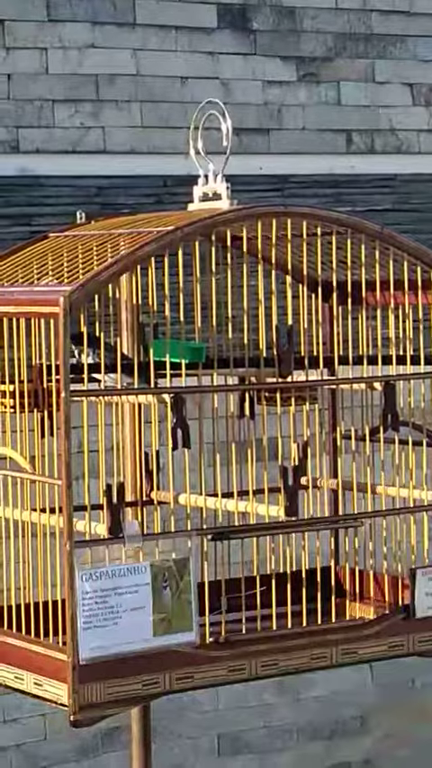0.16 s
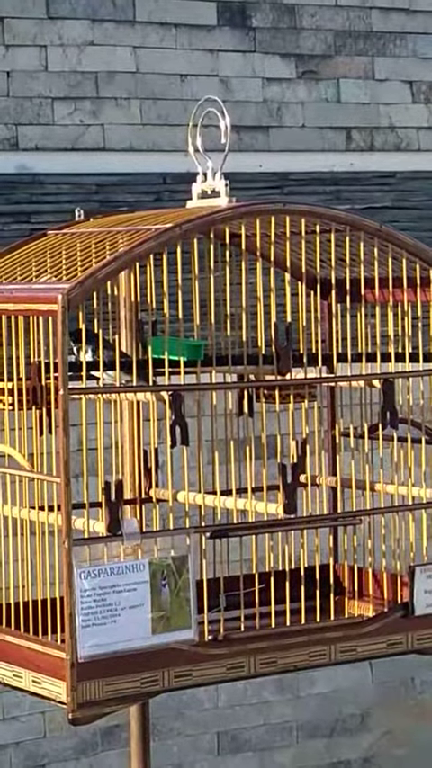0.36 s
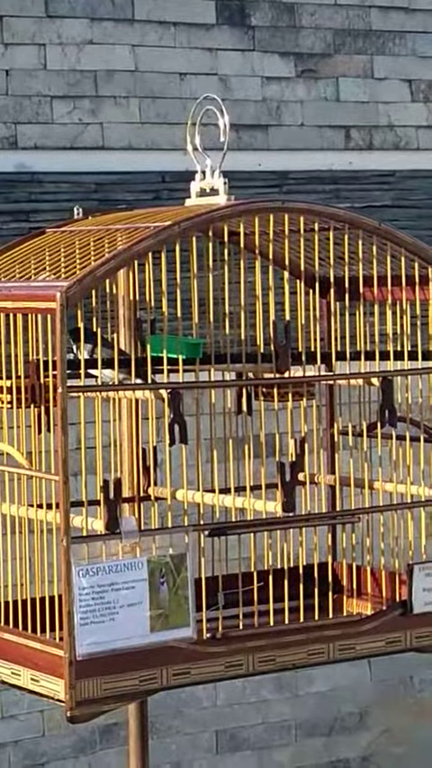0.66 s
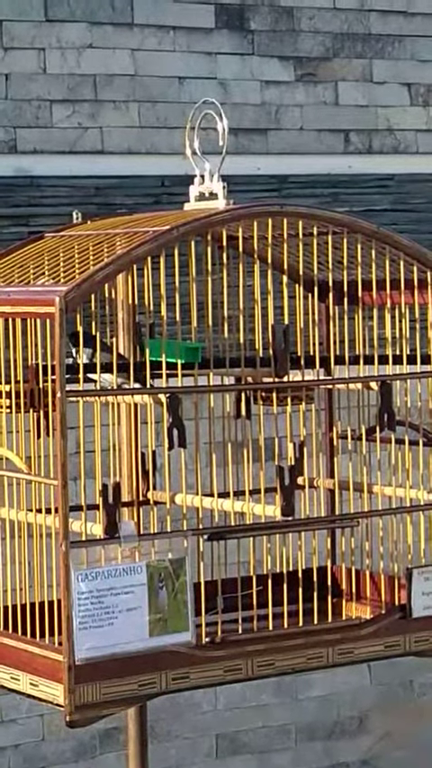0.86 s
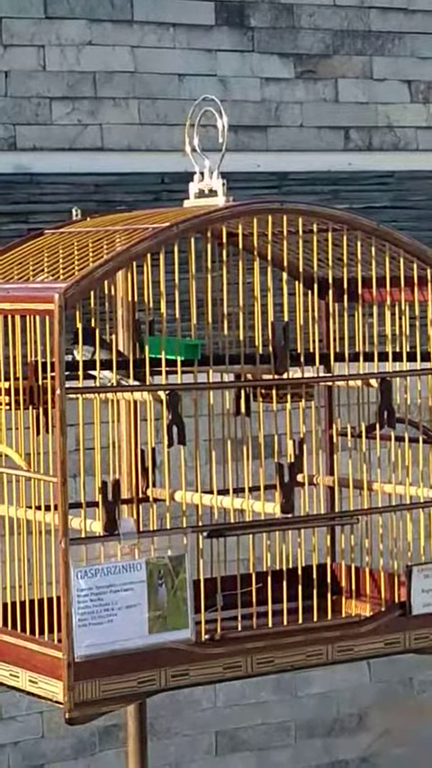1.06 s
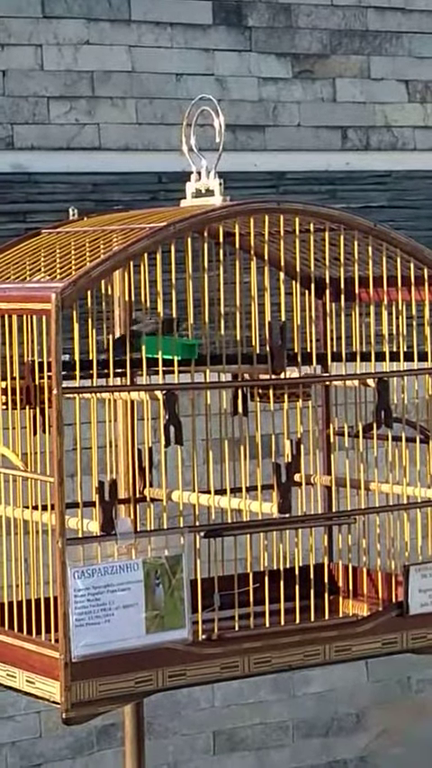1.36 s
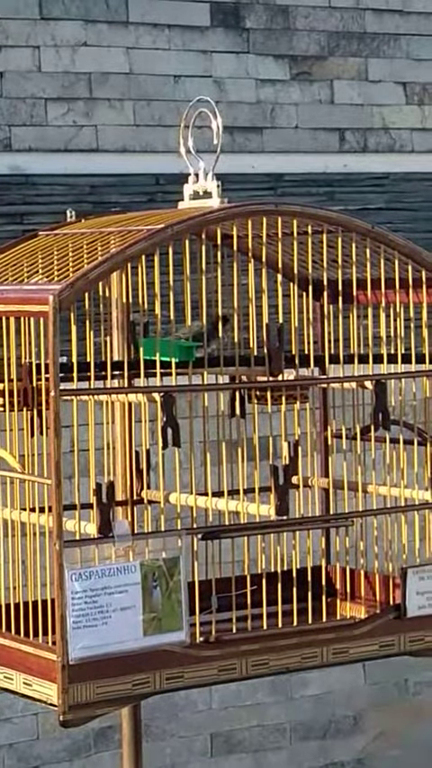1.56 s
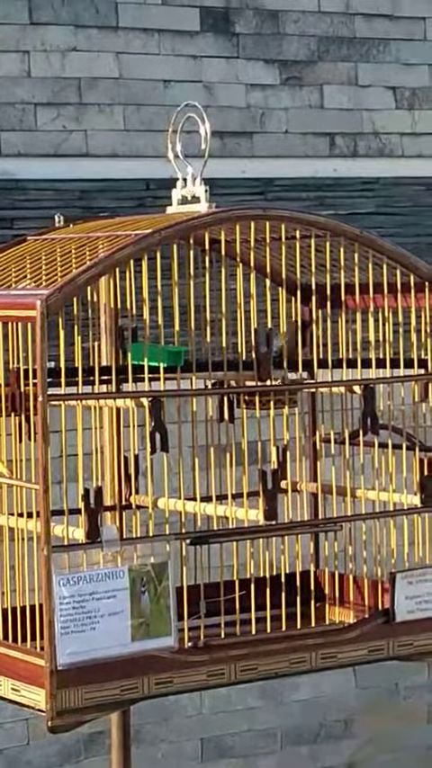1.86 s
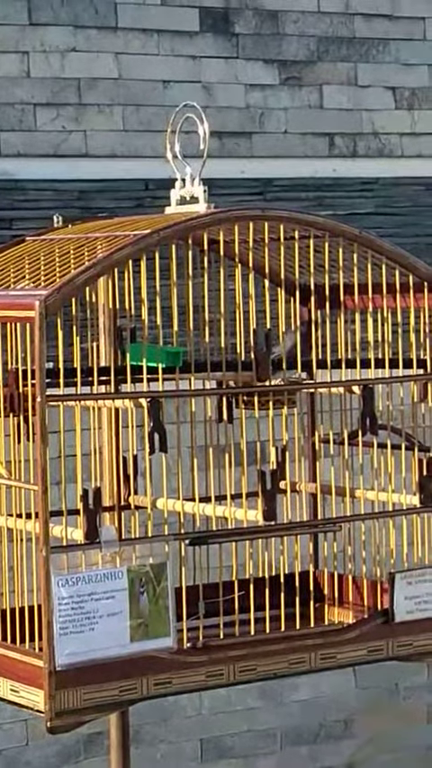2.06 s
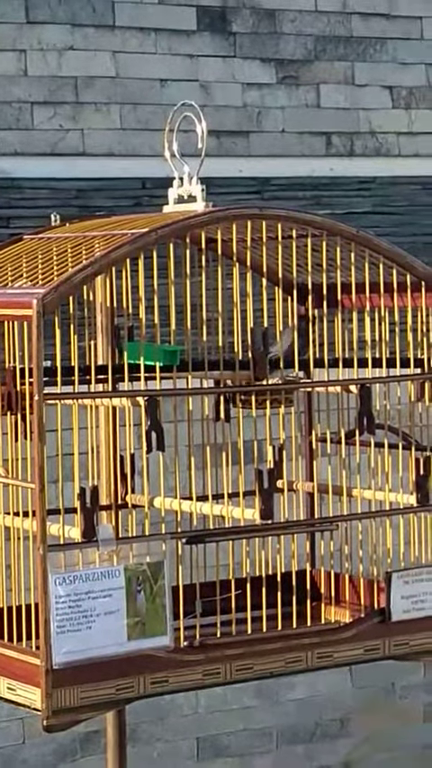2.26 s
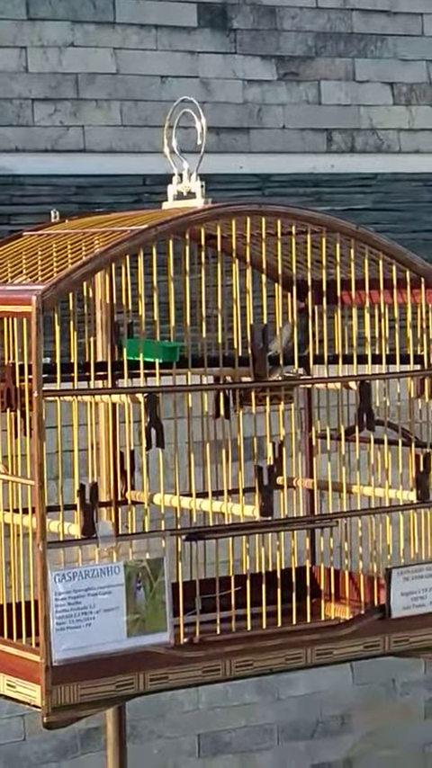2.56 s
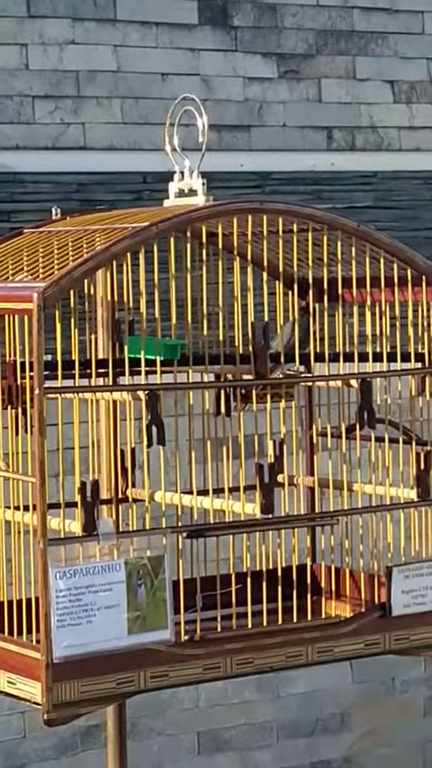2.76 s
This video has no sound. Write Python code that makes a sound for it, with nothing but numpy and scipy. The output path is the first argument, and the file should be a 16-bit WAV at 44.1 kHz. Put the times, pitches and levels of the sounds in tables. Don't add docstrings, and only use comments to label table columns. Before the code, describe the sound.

Birdsong in a walled yard: high whistles, a loud rapid closing trill, irregular wooden knocking, low hum

```python
import sys
import numpy as np
from scipy import signal
from scipy.fft import rfft, irfft
from scipy.io import wavfile
from scipy.ndimage import uniform_filter1d

SR = 44100
rng = np.random.default_rng(int(sys.argv[2]) if len(sys.argv) > 2 else 0)


def output_pcm(signal):
    pcm = np.clip(np.atleast_2d(signal).T, -1, 1) * 32767
    wavfile.write(sys.argv[1], SR, np.round(pcm).astype(np.int16))


def ratio_of_db(decibels):
    return 10 ** (np.asarray(decibels, float) / 20)


N = 127890
LEAD = SR // 5

# second harmonic in dB, third harmonic in dB.
OVERTONES = [(-21, -14.5), (-22, -22.5), (-24, -28), (-31.5, -26.5), (-55, -44)]


def evened(x):
    return x / np.sqrt(np.mean(x ** 2) + 1e-20)


def read(points, hz):
    f, value = np.transpose(points)
    return np.interp(np.log(hz + 1), np.log(f + 1), value)


def add(mix, s, sound):
    part = mix[round(s * SR) + LEAD:][:len(sound)]
    part += sound[:len(part)]


def drift(count, size):
    return evened(uniform_filter1d(uniform_filter1d(rng.standard_normal(count), size), size))


def whistle(hz, level_db, second_db, third_db):
    waver, haze_db, flutter_db, fade_samples = .002, -24, 1.2, 200
    count = len(hz)
    turn = 2 * np.pi * np.cumsum(hz * (1 + waver * drift(count, size=60))) / SR
    third = np.sin(3 * turn) * (hz < SR / 8)
    fourth = .5 * np.sin(4 * turn) * (hz < SR / 12)
    upper = ratio_of_db(second_db) * np.sin(2 * turn) + ratio_of_db(third_db) * (third + fourth)
    tone = np.sin(turn) * (1 + ratio_of_db(haze_db) * drift(count, size=10))
    tone = tone + upper * (1 + .5 * drift(count, size=45))
    i = np.arange(count)
    edge = np.minimum(np.minimum(i, i[::-1]) / fade_samples, 1)
    return np.sqrt(2) * tone * edge * ratio_of_db(level_db + flutter_db * drift(count, size=120))


def phrase(notes, overtones):
    out = np.zeros(N + LEAD)
    for note in notes:
        s, hz, db = np.transpose(note)
        s = np.sort(s)
        t = np.arange(s[0], s[-1], 1 / SR)
        glide_hz = uniform_filter1d(np.interp(t, s, hz), size=400)
        add(out, s[0], whistle(glide_hz, np.interp(t, s, db), *overtones))
    return out


def songbirds():
    # time in seconds, pitch in Hz, level in dB.
    warble = [
        [(-.09, 5257, -40.5), (-.06, 5120, -41), (-.03, 3785, -35), (-.005, 4140, -88)],
        [(.083, 3553, -50), (.1, 3000, -50.5), (.122, 2420, -59), (.152, 3332, -49), (.178, 3608, -41.5),
         (.2, 4293, -37), (.225, 4417, -48.5), (.25, 4260, -37)],
        [(.31, 5530, -48), (.332, 5160, -37.5), (.357, 5862, -45.5), (.382, 5590, -37.5), (.407, 4730, -38.5)],
        [(.485, 4380, -45), (.51, 3018, -52), (.54, 4075, -41), (.565, 3800, -50), (.6, 3092, -45.5)],
        [(.675, 5278, -40.5), (.695, 5367, -43.5), (.715, 4054, -37.5), (.76, 4356, -51.5), (.785, 4410, -42)],
        [(.89, 3714, -63), (.92, 2595, -49), (.94, 3770, -52), (.965, 3100, -54.5), (1.01, 3105, -73)],
    ]
    neighbour = [
        [(1.01, 3643, -60), (1.05, 3498, -47), (1.085, 3270, -48.5), (1.12, 3270, -71)],
        [(1.215, 3926, -53.5), (1.25, 3794, -48.5), (1.275, 3304, -40.5), (1.3, 2876, -52.5)],
        [(1.31, 3668, -42), (1.34, 3680, -52), (1.35, 3640, -78), (1.365, 3577, -49.5), (1.39, 3513, -37),
         (1.43, 3276, -48)],
        [(2.03, 8470, -72), (2.052, 7220, -25.5), (2.08, 6747, -35), (2.125, 6570, -37)],
        [(2.14, 4900, -48), (2.17, 5910, -50.5), (2.2, 6100, -65)],
        [(2.26, 5320, -46.5), (2.285, 6500, -36.5), (2.31, 7600, -37)],
        [(2.3, 5390, -49.5), (2.325, 4840, -30), (2.35, 4350, -63)],
        [(2.375, 3400, -57), (2.4, 3850, -50), (2.43, 4000, -61)],
    ]
    falls = [
        [(1.487, 5570, -57), (1.5, 6134, -44), (1.54, 6260, -40), (1.58, 5850, -31.5), (1.615, 4616, -26)],
        [(1.645, 4226, -46), (1.665, 4200, -37.5), (1.69, 4190, -40), (1.715, 4126, -39), (1.75, 3917, -36.5),
         (1.83, 3935, -60)],
        [(1.86, 7870, -39.5), (1.872, 6700, -36), (1.89, 5600, -32.5), (1.92, 4430, -32.5),
         (1.955, 3620, -43.5)],
    ]
    rises = [
        [(1.86, 2543, -56), (1.92, 2910, -41.5), (1.96, 3374, -33.5), (2.0, 3470, -30), (2.03, 3570, -64)],
        [(2.13, 2500, -55), (2.165, 2760, -40), (2.195, 3061, -34.5), (2.22, 3160, -37), (2.245, 3710, -29.5),
         (2.268, 4076, -22), (2.3, 4320, -27.5), (2.325, 3970, -55)],
        [(2.365, 2777, -61), (2.39, 2720, -33.5), (2.42, 3110, -36.5), (2.44, 3250, -30.5), (2.46, 3600, -30),
         (2.478, 3954, -26), (2.51, 4065, -23.5), (2.525, 3947, -40), (2.54, 3880, -63)],
    ]
    # left over right in dB, close reflections in dB, wall echo in dB, yard in dB.
    perches = [(1.2, -4, -7, -0.5), (-1.5, -8.5, -63, -6), (3.5, -6.5, -8.5, -4), (3.5, -5, -8, -9.5)]
    songs = zip((warble, neighbour, falls, rises), OVERTONES, perches)
    return sum(place(phrase(notes, overtones), *perch) for notes, overtones, perch in songs)


def trill():
    # middle of the sweep in seconds, level in dB.
    sweeps = [(2.588, -28.5), (2.598, -28.5), (2.610, -21), (2.618, -36), (2.631, -19.5), (2.64, -29),
              (2.652, -19.5), (2.666, -24), (2.673, -21.5), (2.69, -29.5), (2.7, -22), (2.711, -19.5),
              (2.724, -29), (2.739, -21), (2.748, -27.5), (2.761, -29), (2.77, -25.5), (2.783, -27),
              (2.797, -33)]
    sweep_s, sharpness, hiss_db = .015, 0.4, -16
    throat_hz, throat_db = 5350, -30
    u, out = np.linspace(0, 1, round(sweep_s * SR)), np.zeros(N + LEAD)
    shapes = np.linspace((6404, 3800, 1), (7767, 3100, .75), len(sweeps))
    for (s, db), (start_hz, end_hz, bend) in zip(sweeps, shapes):
        hz = start_hz * (end_hz / start_hz) ** u ** bend * rng.uniform(.96, 1.04)
        tone = whistle(hz, db + throat_db * np.log2(hz / throat_hz) ** 2, *OVERTONES[-1])
        hiss = signal.lfilter(*signal.butter(2, .12, 'high'), rng.standard_normal(len(u)))
        swell = abs(np.sin(np.pi * u)) ** sharpness
        add(out, s - sweep_s / 2, (tone + hiss * ratio_of_db(db + hiss_db)) * swell)
    return out


def flap():
    start_s, level_db, t60_s = 1.832, -35.5, 0.058
    t, out = np.arange(8000) / SR, np.zeros(N + LEAD)
    rustle = signal.lfilter(*signal.butter(2, .2, 'high'), rng.standard_normal(len(t)))
    add(out, start_s, rustle * ratio_of_db(level_db - 60 * t / t60_s))
    return out


def knocks():
    # time in seconds, peak level in dB, main ring in Hz.
    onsets = [(0.088, -21, 975), (0.094, -21.5, 874), (0.122, -29, 945), (0.149, -30.5, 838),
              (0.333, -31, 884), (0.498, -41, 860), (0.536, -32, 870), (0.615, -29, 964),
              (0.663, -36.5, 794), (0.919, -25, 926), (0.933, -23.5, 862), (0.97, -25.5, 918),
              (1.185, -30, 851), (1.24, -38, 864), (1.353, -35, 861), (1.436, -27.5, 944),
              (1.471, -28, 814), (1.526, -35, 855), (1.713, -17.5, 980), (1.735, -23, 851),
              (1.77, -27, 846), (1.793, -48.5, 840), (1.962, -32.5, 830), (2.114, -42, 850),
              (2.223, -40, 977), (2.248, -31, 793), (2.501, -29.5, 950), (2.52, -23.5, 838),
              (2.561, -35.5, 906), (2.579, -34, 945), (2.652, -36.5, 960), (2.757, -30.5, 860)]
    # frequency in Hz, level in dB, t60 in seconds.
    wood = [(900, 11.5, 0.021), (1092, 5.5, 0.014), (422, -6, 0.051), (557, 1.5, 0.022), (244, -12, 0.064),
            (1537, -2, 0.013), (2500, -9, 0.02)]
    trim_db, tick_db, tick_t60_s, mode_spread = -2, -30, 0.014, .24
    t, out = np.arange(5000) / SR, np.zeros(N + LEAD)
    hz, mode_db, t60_s = np.transpose(wood)[:, :, None]
    chances = .5 + rng.random((len(onsets), 2, len(wood)))
    for (s, db, ring_hz), (struck, off) in zip(onsets, chances):
        spread_hz = hz * (1 + mode_spread * (off[:, None] - 1))
        tuned_hz = np.vstack([[ring_hz], spread_hz[1:]])
        modes = ratio_of_db(mode_db - 60 * t / t60_s) * np.sin(2 * np.pi * tuned_hz * t)
        tick = uniform_filter1d(rng.standard_normal(len(t)), size=3) * ratio_of_db(tick_db - 60 * t / tick_t60_s)
        onset = np.minimum(t / .004, 1)
        add(out, s - .002, ratio_of_db(db + trim_db) * onset * (struck @ modes + tick))
    return out


def yard(x):
    # frequency in Hz, t60 in seconds.
    decay = [(300, 1), (1000, 0.46), (3000, 1), (5500, 0.67), (12000, 0.71)]
    taps = np.zeros((2, SR))
    at = np.arange(400, SR - 20, 20) + rng.integers(0, 20, (2, (SR - 401) // 20))
    np.put_along_axis(taps, at, rng.choice([-1., 1.], at.shape), 1)
    hz, t, z = signal.stft(taps, SR, nperseg=256)
    tail = signal.istft(z * ratio_of_db(-60 * t / read(decay, hz)[:, None]), SR, nperseg=256)[1]
    return signal.fftconvolve(x[None], tail / np.linalg.norm(tail[0]), axes=1)[:, :len(x)]


def place(x, pan_db, early_db, echo_db, yard_db):
    echo_s, far_echo_s, far_echo_db = (.0245, .0246), 0.14, -51
    taps = np.zeros((2, SR // 7))
    at, sign = rng.integers(60, 900, 8), rng.uniform(-1, 1, (3, 8))
    for side in range(2):
        taps[side, at] = ratio_of_db(early_db) * (sign[2] + 0.57 * sign[side])
        taps[side, round(echo_s[side] * SR)] = ratio_of_db(echo_db)
        taps[side, round(far_echo_s * SR)] = ratio_of_db(far_echo_db)
        taps[side, 0] = 1
    near = signal.fftconvolve(x[None], taps, axes=1)[:, :len(x)]
    tail = yard(x)
    tail = np.array([tail[0], .93 * tail[0] + .36 * tail[1]])
    return near * ratio_of_db(np.array([[pan_db / 2], [-pan_db / 2]])) + ratio_of_db(yard_db) * tail


def hum():
    # frequency in Hz, level in dB per Hz.
    city = [(42, -50), (65, -0.5), (140, 9.5), (500, -3.5), (900, -4), (1900, -18), (3300, -32),
            (5200, -20.5), (7500, -26), (14000, -26.5)]
    # frequency in Hz, left-right likeness from 0 to 1.
    likeness = [(30, .1), (130, 0.65), (300, 0.32), (700, 0.74), (1500, 1), (3000, 0.73)]
    level_db, patch_db, pan_db = -48.5, 2, 2.2
    frames, hz = N // 256 + 5, np.fft.rfftfreq(1024, 1 / SR)
    a, b, c, d, patches = rng.standard_normal((frames, 513, 5)).T
    patches = evened(uniform_filter1d(uniform_filter1d(patches, size=8, axis=0), size=12, axis=1))
    same = np.clip(read(likeness, hz), -1, 1)[:, None]
    left, other = a + 1j * b, c + 1j * d
    z = np.array([left, same * left + np.sqrt(1 - same ** 2) * other])
    balance_db = np.array([pan_db / 2, -pan_db / 2])[:, None, None]
    z = z * ratio_of_db(read(city, hz)[:, None] + patch_db * patches + balance_db)
    return ratio_of_db(level_db) * evened(signal.istft(z, nperseg=1024, noverlap=768)[1][:, :N])


def scene():
    birds = songbirds() + place(trill() + flap(), pan_db=.5, early_db=-11, echo_db=-11, yard_db=-8)
    wood = knocks()
    tail = yard(wood)
    boards = wood + ratio_of_db(-4.5) * (tail.mean(0) + .5 * tail)
    return (birds + boards)[:, LEAD:] + hum()


def masked(x):
    mask_db, hole_db = -9.5, -35
    hz, _, z = signal.stft(np.array([x[0] + x[1], x[0] - x[1]]) / 2, SR, nperseg=1024)
    power = uniform_filter1d(abs(z) ** 2, size=3, axis=2)
    band = np.repeat(power[:, :512].reshape(2, 64, 8, -1).mean(2), 8, axis=1)
    around = uniform_filter1d(band ** .5, size=64, axis=1)
    weak = band < (ratio_of_db(mask_db) * around) ** 2
    open_hz = (hz > 1900) & (hz < 2650) | (hz > 4400)
    weak = np.concatenate([weak, weak[:, :1]], axis=1) & open_hz[:, None]
    mid, side = signal.istft(z * np.where(weak, ratio_of_db(hole_db), 1), SR, nperseg=1024)[1][:, :N]
    return np.array([mid + side, mid - side])


def band_limit(x):
    return signal.sosfilt(signal.butter(12, 15130, fs=SR, output="sos"), x)


def record(dry):
    # frequency in Hz, gain in dB.
    mic = [(1700, 0.08), (2250, 10), (2800, 9.5), (7500, 4), (9400, 0), (11000, 8), (13600, 6.5)]
    ceiling, edge_hz, treble_right_db, right_lag_s = .45, 14300, 7.5, .000425
    hz = np.fft.rfftfreq(N, 1 / SR)
    dry = ceiling * np.tanh(dry / ceiling)
    tilt_db = treble_right_db * np.clip(hz / 12000, 0, 1) ** 2 * np.array([[-.5], [.5]])
    treble = np.interp(hz, (1400, 2000), (0, 1))
    lag = (2 * np.pi * hz * right_lag_s - np.pi) * treble * np.array([[0], [1]])
    response = np.exp(-1j * lag) * ratio_of_db(read(mic, hz) + tilt_db) * (hz < edge_hz)
    coloured = irfft(rfft(dry) * response, N)
    return band_limit(masked(coloured))


dry = scene()
out = record(dry)
output_pcm(out)
```